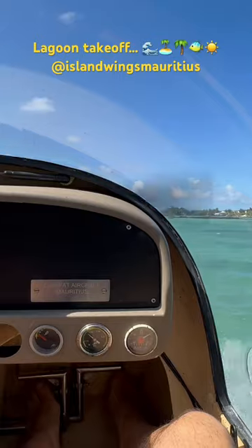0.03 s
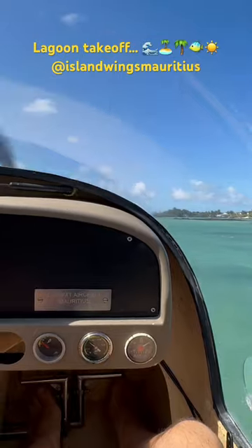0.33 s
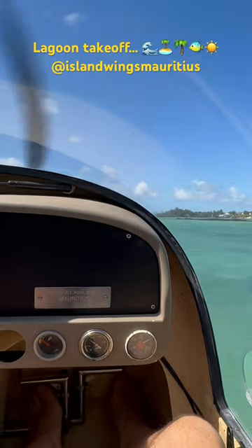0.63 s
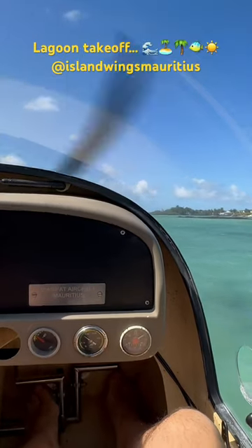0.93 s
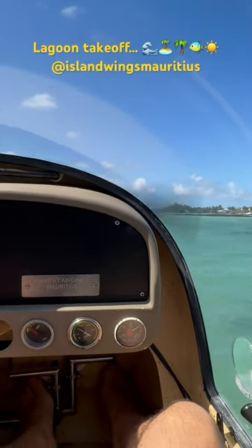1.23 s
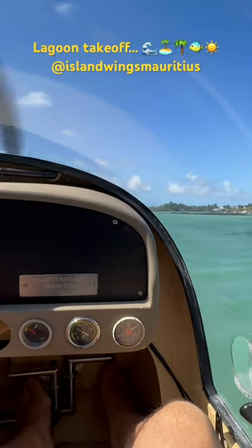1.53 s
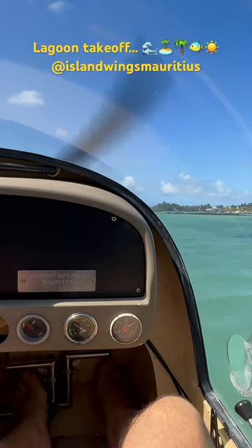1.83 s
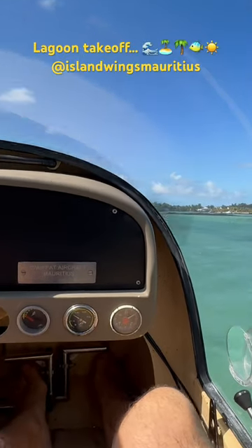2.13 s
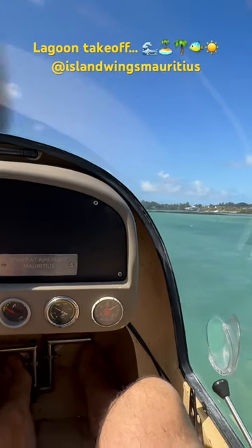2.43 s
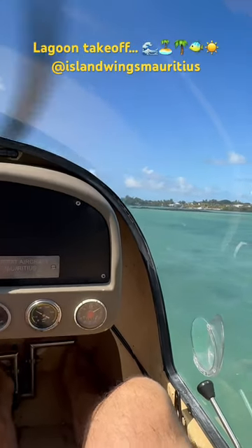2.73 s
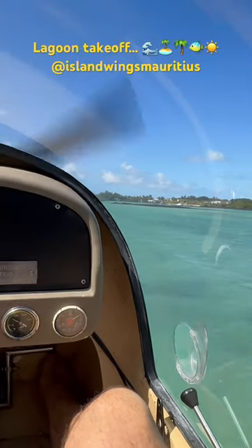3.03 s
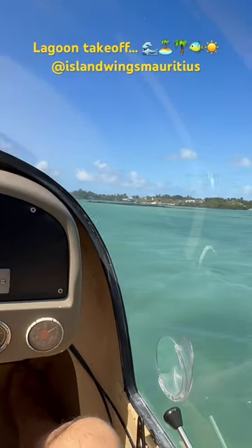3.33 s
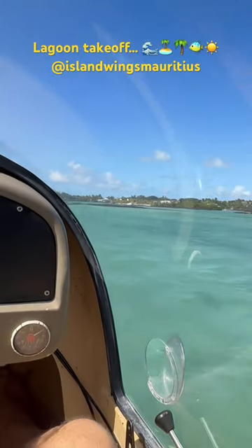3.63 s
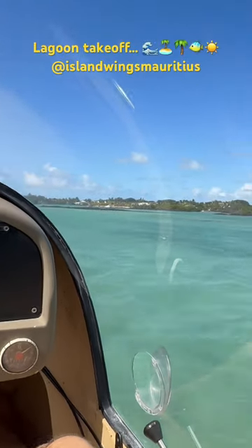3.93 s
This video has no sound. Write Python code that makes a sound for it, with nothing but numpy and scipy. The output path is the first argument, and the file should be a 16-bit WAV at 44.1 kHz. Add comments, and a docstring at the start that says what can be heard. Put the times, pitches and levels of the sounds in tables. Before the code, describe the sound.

Heard from the cabin, a small seaplane's engine and propeller drone at a constant pitch with a rough snarl. Deep pounding from the water fades early, while low rumble and the rush of wind and spray continue.

```python
"""A loud, steady drone fills the cabin of a small seaplane at take-off power. It is the harmonic series
of a four-cylinder four-stroke engine, joined by the tones of a geared three-blade propeller. Beneath it
the airframe rumbles and the floats pound on the water; prop wash beats on the canopy, and wind and
spray hiss outside. The sound is loudest in the first half second, then slowly eases."""
import sys
import numpy as np
from scipy import signal
from scipy.fft import rfft, irfft, next_fast_len
from scipy.io import wavfile
from scipy.ndimage import uniform_filter1d, map_coordinates

SR = 44100
rng = np.random.default_rng(int(sys.argv[2]) if len(sys.argv) > 2 else 0)


def unload_wav(signal):
    """Save mono or channel-first audio to the path in sys.argv[1] as 16-bit WAV at rate SR, clipped to [-1, 1]."""
    wavfile.write(
        sys.argv[1],
        SR,
        np.round(np.clip(np.atleast_2d(signal).T, -1, 1) * 32767).astype(np.int16),
    )


N = 176400

# Diffuse noise at the two microphones: (frequency [Hz], coherence [ratio, clipped to 1])
COHERENCE = [(28, 2), (60, 0.7), (160, 1), (280, 1.1), (450, 0), (900, 0), (2000, 0), (3500, 0.11),
             (9000, -0.08), (10300, 0.25), (11000, 2.24), (15000, 0)]
# Its balance: (frequency [Hz], left over right [dB])
BALANCE = [(80, 0.5), (200, 1), (330, -1.5), (700, 2.5), (1300, 2), (2700, 0.5), (3600, 2.5), (4600, 6),
           (7000, 4.5), (8200, 1), (9100, -3.5), (10000, -5), (10500, 0)]
# Envelopes of the four noises: (time [s], level [dB])
HISS_LEVEL = [(0.06, -34), (0.29, -33.5), (0.56, -37), (1.42, -37.5), (3.98, -40.5), (4.0, -42)]
POUND_LEVEL = [(.05, -26), (.3, -26), (.45, -25), (.62, -30), (.8, -25), (.95, -34), (1.35, -30),
               (1.7, -37), (4, -39)]
WASH_LEVEL = [(0.06, -27.5), (0.33, -27), (0.54, -29.5), (1.79, -30.5), (2.39, -32.5), (2.4, -30.5),
              (3.16, -33.5), (3.49, -32), (3.52, -38), (3.56, -32), (4.0, -33.5)]
RUMBLE_LEVEL = [(0.06, -16.5), (0.82, -19), (0.92, -21.5), (1.4, -18), (1.42, -21), (2.53, -20),
                (2.55, -25.5), (2.87, -20), (2.91, -25.5), (3.24, -20), (3.29, -26.5), (3.35, -22.5),
                (3.89, -21), (4.0, -25)]
# Their spectra: (frequency [Hz], relative spectral density [dB])
HISS_SPECTRUM = [(1200, -15), (2600, -3), (3800, 0.5), (4700, -1), (6300, -2.5), (8400, -3.5),
                 (10000, -8.5), (12000, -16.5), (15000, -33.5)]
POUND_SPECTRUM = [(20, -25), (34, 3.5), (60, 1), (85, 4), (130, -12), (250, -37)]
WASH_SPECTRUM = [(200, -27), (350, -1), (480, 0.5), (620, -2), (760, -4.5), (900, 2.5), (1100, -5.5),
                 (1350, -4), (1700, -7), (2100, -8), (2800, -16), (4000, -30), (8000, -41)]
RUMBLE_SPECTRUM = [(18, -28), (27, -21), (35, -6), (50, 1.5), (90, -1), (140, 0.5), (200, -3), (260, -5.5),
                   (340, -8), (430, -16), (700, -43)]
# Slaps of spray on the hull: (time [s], level relative to the hiss [dB])
SLAPS = [(1.37, 0), (2.105, 2), (2.42, -3), (2.53, -1)]
# Engine speed: (time [s], four-stroke cycle rate [Hz])
CYCLE_RATE = [(0, 44.7), (.2, 44.75), (.6, 44.92), (2.3, 44.91), (2.8, 44.84), (3.6, 44.81), (4, 44.84)]
# Propeller tones: (order [multiple of the shaft rate], level [dB])
PROP_ORDERS = [(1, -33.5), (2, -36.5), (3, -28), (4, -32), (6, -33.5), (9, -43.5)]
# Engine harmonics: (order [multiple of the cycle rate, rounded in use], level [dB],
# left over right [dB], left-right correlation [ratio], drift [dB/s])
ENGINE_ORDERS = [(2, -30.5, 5.5, 0.98, -0.5), (3, -30.5, -7, 0.98, 1.5), (4, -21, -0.5, 1.0, 0.0),
                 (5, -19.5, -2.5, 0.88, 0.0), (6, -30.5, 0.5, 0.88, 0.5), (7, -43, -11, 0.63, -0.5),
                 (8, -32, -4.5, 0.77, 1.0), (10.02, -42, -2, -0.46, 2.0), (11, -36, -5, -0.69, 0),
                 (12, -38, 4, -0.46, -3.5), (13, -40, 4, -0.72, 4), (14, -40, 3, -0.87, -1),
                 (15, -34.5, -11.5, 0.21, 0.5), (16, -44.5, -6, -0.37, -2.5), (17, -42.5, -1.5, -0.52, 3.5),
                 (18, -39.5, 6, -0.4, 1.0), (19, -40.5, -2, -0.36, -0.5), (20, -37, 2.5, 0.83, -0.5),
                 (21, -42.5, -4, 0.65, -1.5), (22, -41, -9, -0.0, -1.5), (23, -43.5, 2, 0.7, 1),
                 (24, -53, 9, -0.5, 4), (25, -45.5, 3, 0.019, 0.5), (26, -44, 7, -0.81, 5),
                 (27, -45, -11, 0.0, 1.5), (28, -38.5, 16, 0.9, 0), (29, -44.5, 3, 0.4, -2),
                 (30, -41.5, 22, 0.33, 1), (31, -42, 15, -0.29, -2.5), (34, -42.5, -2, -0.66, 1.5),
                 (36, -43.5, -1, -0.18, -0.5), (38, -40.5, 7.5, -0.7, 2.5), (39, -54, -4, -0.8, 6),
                 (43, -47.5, 8, -0.3, 0), (46, -49.5, 2, -0.15, -0.5), (47, -47.5, 15, 0.2, -0.5),
                 (55, -48.5, 9, 0.44, -0.5)]
# Tone between the harmonics: (order [multiple of the cycle rate], level [dB], drift [dB/s])
SIDE_TONE = (19.48, -42.5, -.8)
# Gain of the low drone and of the upper orders' snarl: (time [s], gain [dB])
DRONE_GAIN = [(.05, 2.5), (.2, 2.5), (.42, 3.5), (.65, -0.5), (1.3, .5), (1.7, -.5), (2.5, 0.5),
              (3.1, -1.5), (4, -1.5)]
SNARL_GAIN = [(.05, 4), (.35, 4), (.6, .5), (1.8, 1.5), (2.6, -1.5), (3.3, -2), (4, -3)]
# Narrow notches in the response: (frequency [Hz], width [Hz], depth [dB])
NOTCHES = [(5210, 87, 23), (7520, 120, 17), (9420, 110, 7)]

GEAR_RATIO = 51 / 21  # crank turns per propeller turn
SNARL_HZ = 449.7  # orders above this ring from the cabin panels
DRONE_WAVER_DB, SNARL_WAVER_DB, ROUGH_RAD = .6, 2.2, .3


def amp(db):
    """Decibels to amplitude ratio."""
    return 10 ** (np.asarray(db) / 20)


def unit(x):
    """Normalisation to rms 1."""
    return x / np.sqrt(np.mean(x ** 2) + 1e-20)


def along(points, hz):
    """Interpolation on a logarithmic frequency axis."""
    freqs, values = np.transpose(points)
    return np.interp(np.log(hz + 1), np.log(freqs + 1), values)


def curve(rows):
    """Linear interpolation in time, one value per sample."""
    return np.interp(np.arange(N) / SR, *np.transpose(rows))


def wobble(rate):
    """Smooth random modulation: a spline through rate knots a second."""
    knots = rng.standard_normal(int(N * rate / SR) + 4)
    coarse = np.linspace(0, N, 4096)
    return np.interp(np.arange(N), coarse, map_coordinates(knots, [coarse * rate / SR]))


def filtered(x, response):
    """Linear filtering: the spectrum is multiplied by a frequency response."""
    size = next_fast_len(N + SR // 2)
    return irfft(rfft(x, size) * response(np.fft.rfftfreq(size, 1 / SR)), size)[..., :N]


def pan(balance_db):
    """Constant-power panning: left and right gains."""
    gains = amp(np.array([balance_db, -balance_db]) / 2)
    return gains / np.sqrt(np.mean(gains ** 2, axis=0))


def diffuse_noise(spectrum, patchy_db):
    """A diffuse field: partly coherent stereo noise of rms 1, uneven in time and frequency."""
    bins = signal.stft(rng.standard_normal((2, N)), nperseg=512)[2]
    patches = uniform_filter1d(rng.standard_normal(bins.shape[1:]), size=8, axis=0)
    patches = uniform_filter1d(patches, size=10, axis=1)
    pair = signal.istft(bins * amp(patchy_db * unit(patches)), nperseg=512)[1][:, :N]
    angle = lambda hz: np.arccos(np.clip(along(COHERENCE, hz), -1, 1)) / 2
    shares = lambda hz: [np.cos(angle(hz)), np.sin(angle(hz))]
    mid, side = filtered(pair, lambda hz: amp(along(spectrum, hz)) * shares(hz))
    return unit(filtered(np.array([mid + side, mid - side]), lambda hz: pan(along(BALANCE, hz))))


def wind_and_spray(beat, gain_db=3.5, beat_share=.2, slap_s=.0095):
    """Broadband hiss with brief slaps of water; being incoherent, they add in power."""
    t = np.arange(N) / SR
    slap_power = sum(amp(db) ** 2 * np.exp(-((t - at) / slap_s) ** 2) for at, db in SLAPS)
    gain = amp(curve(HISS_LEVEL) + gain_db + .42 * wobble(29.94)) * np.sqrt(1 + slap_power)
    return gain * unit((1 + beat_share * (beat - 1)) * diffuse_noise(HISS_SPECTRUM, patchy_db=1.12))


def floats():
    """Impact noise: the floats pound deeply on the chop, dying away as they rise."""
    return amp(curve(POUND_LEVEL)) * diffuse_noise(POUND_SPECTRUM, patchy_db=1.5)


def airframe(gain_db=.5):
    """Structure-borne sound: a low, lumpy rumble of hull and cabin."""
    gain = amp(curve(RUMBLE_LEVEL) + gain_db + .7 * wobble(11))
    return gain * diffuse_noise(RUMBLE_SPECTRUM, patchy_db=.7)


def pulsation(cycle, shaft):
    """Amplitude modulation at the blade-passing, firing and cycle rates."""
    blades, firings = 3 * shaft, 4 * cycle
    return 1 + .15 * np.cos(blades) + .18 * np.cos(firings) + .16 * np.cos(cycle)


def prop_wash(beat, gain_db=4.5):
    """Modulated flow noise: prop wash and exhaust roar pulse on the canopy."""
    gain = amp(curve(WASH_LEVEL) + gain_db + .49 * wobble(24.92))
    return gain * unit(beat * diffuse_noise(WASH_SPECTRUM, patchy_db=1.5))


def rasp(cycle, first=40, count=48, first_db=-51, fall_db_per_octave=8, spread_db=3):
    """Spectral roll-off: the engine's weak top harmonics, with a random phase on each side."""
    out = np.zeros((2, N))
    for order in range(first, first + count):
        db = first_db - fall_db_per_octave * np.log2(order / first)
        db += spread_db * rng.standard_normal((2, 1))
        out += amp(db) * np.sin(order * cycle + rng.uniform(0, 2 * np.pi, (2, 1)) + .5 * wobble(10))
    return amp(curve(SNARL_GAIN)) * out


def side_tone(cycle):
    """An inharmonic partial: a faint tone that follows the engine speed between two harmonics."""
    order, db, drift = SIDE_TONE
    from_middle_s = (np.arange(N) - N / 2) / SR
    level = db + curve(SNARL_GAIN) + drift * from_middle_s + SNARL_WAVER_DB * wobble(5.8)
    return np.sqrt(2) * amp(level) * np.sin(order * cycle + ROUGH_RAD * wobble(70))


def propeller(shaft, waver_db=2.2, waver_rad=.35):
    """Rotational noise: shaft and blade tones, made unsteady by the air that the blades cut."""
    tones = np.zeros(N)
    for order, db in PROP_ORDERS:
        gain = amp(db + waver_db * wobble(4.93))
        phase = round(order) * shaft + rng.uniform(0, 2 * np.pi) + waver_rad * wobble(6.95)
        tones += gain * np.sin(phase)
    return np.sqrt(2) * amp(curve(DRONE_GAIN)) * tones


def engine(cycle):
    """Periodic firing gives a harmonic series: a low drone and a rough snarl from the panels."""
    out = np.zeros((2, N))
    cycle_hz = np.mean(curve(CYCLE_RATE))
    drone_db, snarl_db = curve(DRONE_GAIN), curve(SNARL_GAIN)
    from_middle_s = (np.arange(N) - N / 2) / SR
    for order, db, balance_db, correlation, drift in ENGINE_ORDERS:
        snarls = order * cycle_hz > SNARL_HZ
        if snarls:
            swell_db = snarl_db + SNARL_WAVER_DB * wobble(6.05)
        else:
            swell_db = drone_db + DRONE_WAVER_DB * wobble(6.5)
        # two tones correlate as the cosine of their phase difference
        lead = np.arccos(np.clip(correlation, -.98, .98)) / 2 * np.array([[1], [-1]])
        scatter = rng.uniform(0, 2 * np.pi) + snarls * ROUGH_RAD * wobble(70)
        gain = np.sqrt(2) * pan(balance_db)[:, None] * amp(db + swell_db + drift * from_middle_s)
        out += gain * np.cos(round(order) * cycle + lead + scatter)
    return out


def scene(jitter_s=.00005):
    """Superposition of tones and noise; gearing locks the propeller's phase to the engine's."""
    cycle_hz = curve(CYCLE_RATE)
    cycle = 2 * np.pi * (np.cumsum(cycle_hz) / SR + cycle_hz * jitter_s * wobble(30))
    shaft = 2 * cycle / GEAR_RATIO  # two crank turns per cycle
    beat = pulsation(cycle, shaft)
    tones = engine(cycle) + side_tone(cycle) + propeller(shaft) + rasp(cycle)
    return tones + airframe() + floats() + prop_wash(beat) + wind_and_spray(beat)


def record(dry, start_s=.036, rise_s=.0018, ceiling=.93, top_hz=15300):
    """Output stage: the microphone opens, then narrow notches, soft saturation and a band limit shape the
    sound."""
    dips = lambda hz: amp(-sum(db * np.exp(-((hz - f) / width) ** 2) for f, width, db in NOTCHES))
    opening = np.clip((np.arange(N) / SR - start_s) / rise_s, 0, 1)
    live = filtered(dry, dips) * opening
    rounded = live / (1 + np.abs(live / ceiling) ** 12) ** (1 / 12)
    return filtered(rounded, lambda hz: hz < top_hz)


dry = scene()
out = record(dry)
unload_wav(out)
```